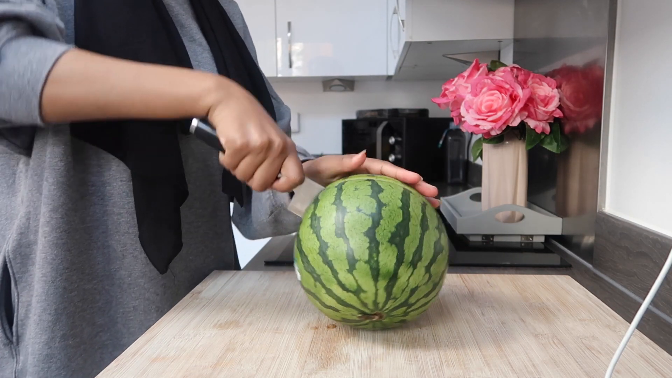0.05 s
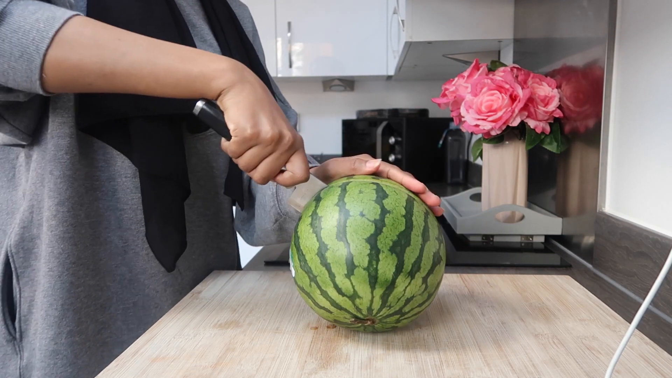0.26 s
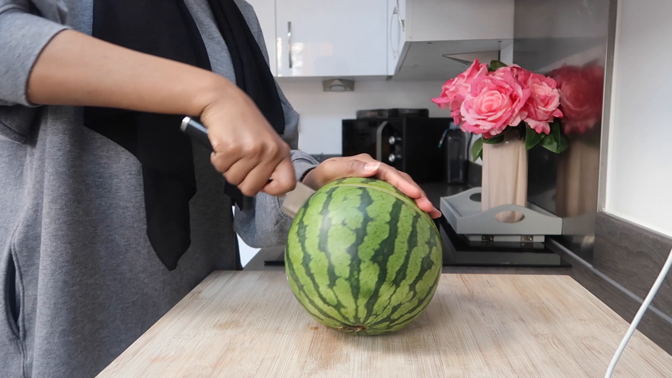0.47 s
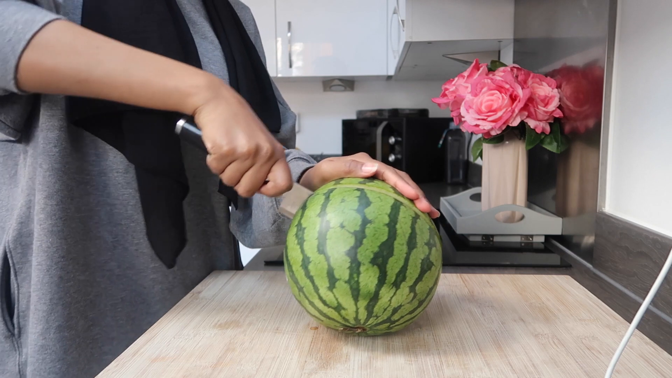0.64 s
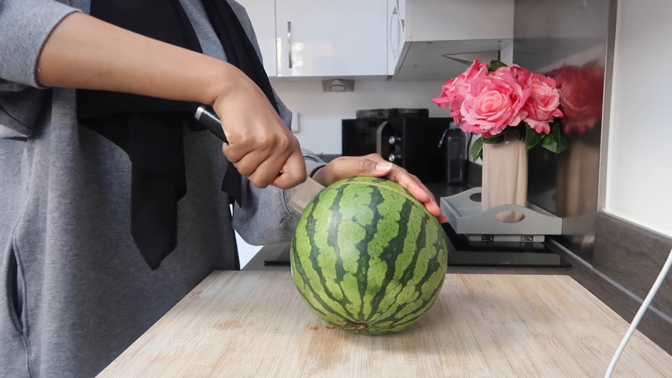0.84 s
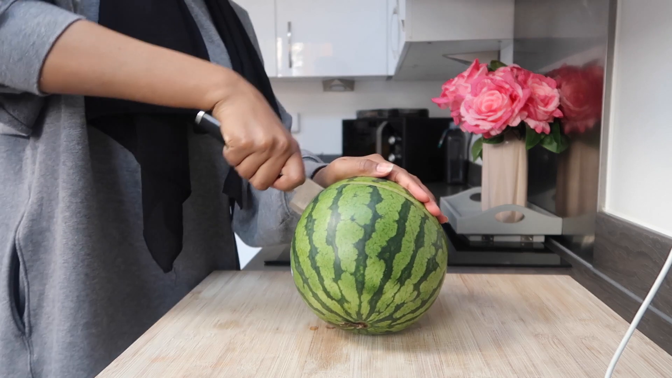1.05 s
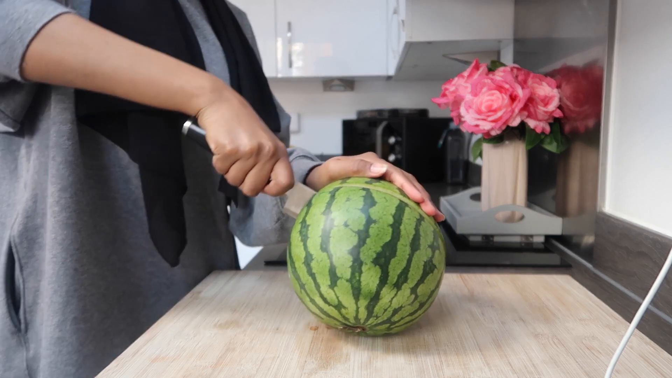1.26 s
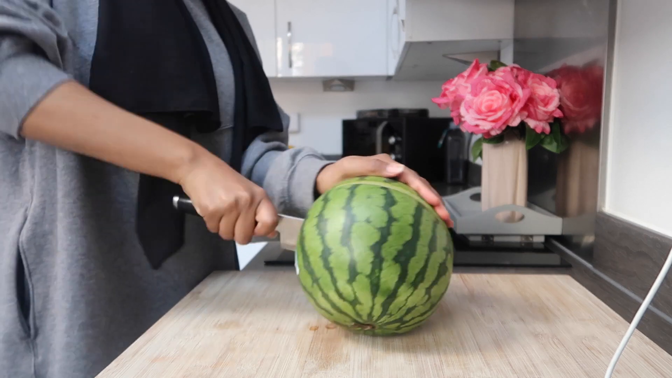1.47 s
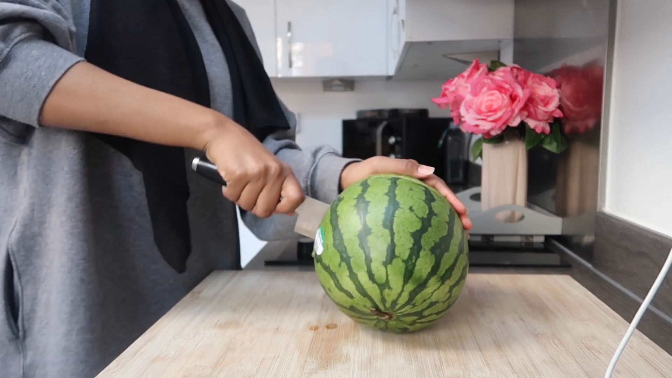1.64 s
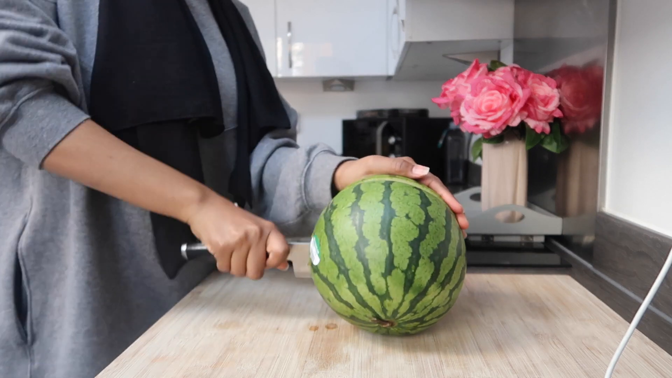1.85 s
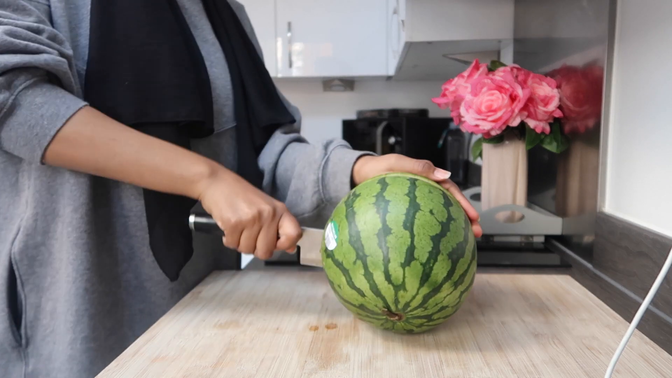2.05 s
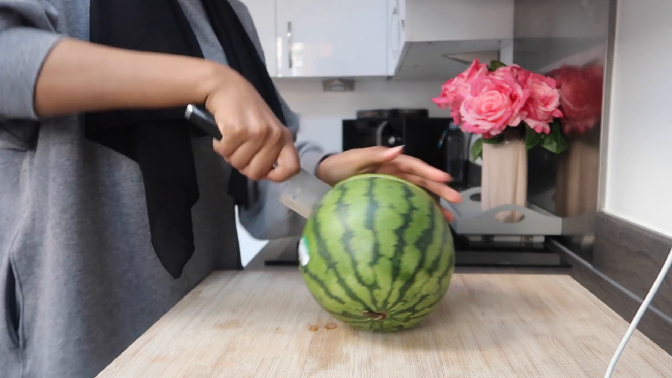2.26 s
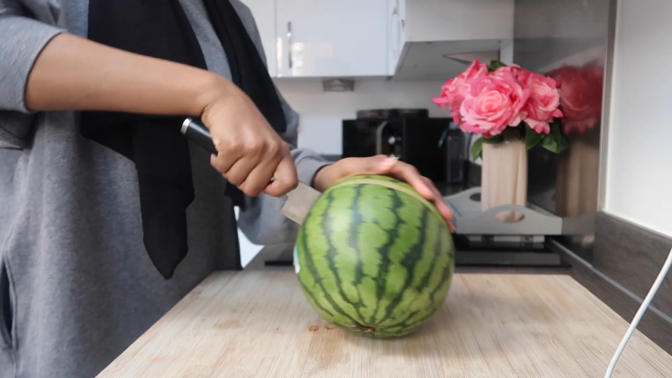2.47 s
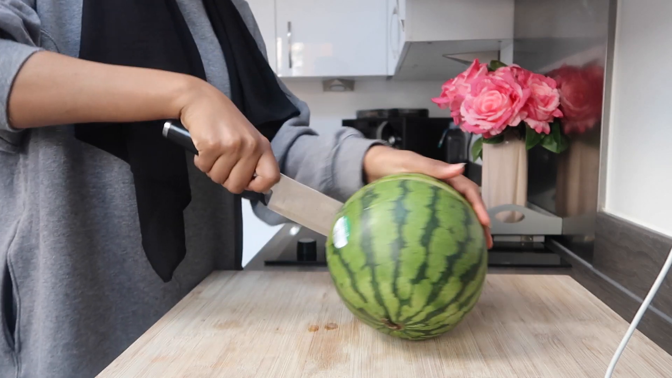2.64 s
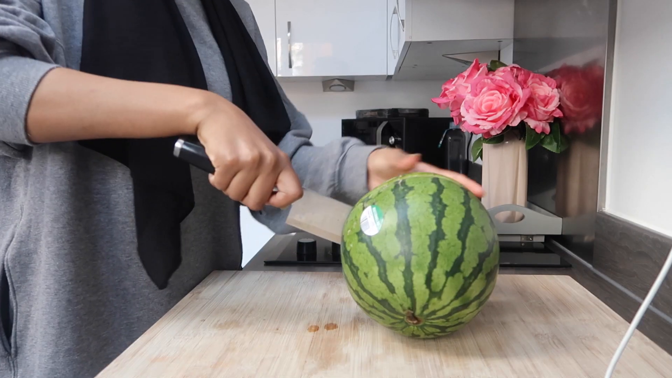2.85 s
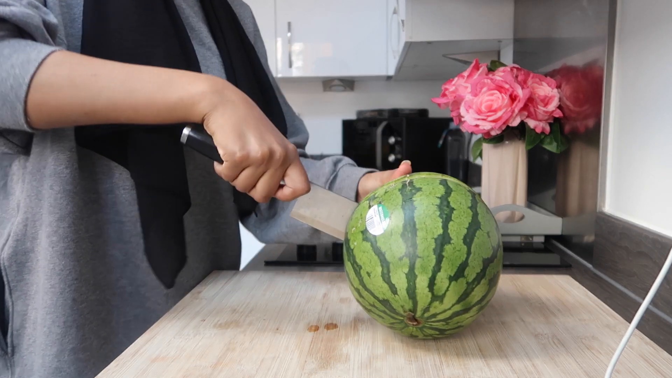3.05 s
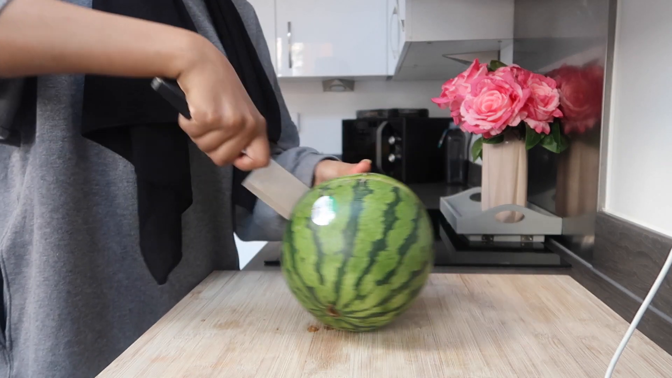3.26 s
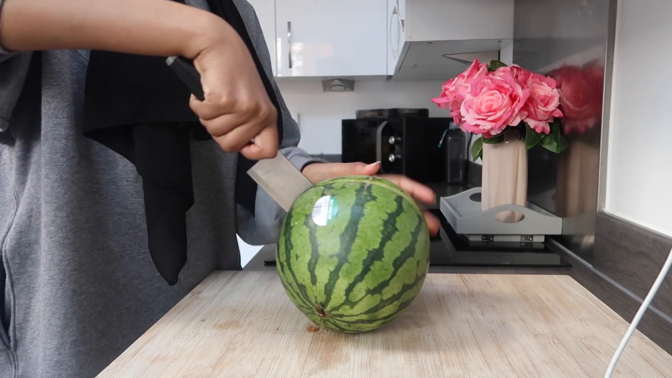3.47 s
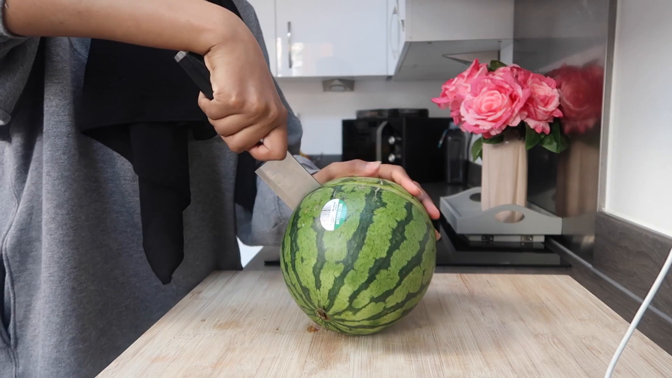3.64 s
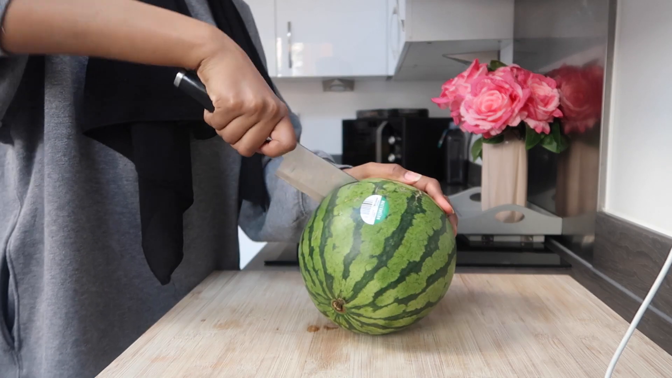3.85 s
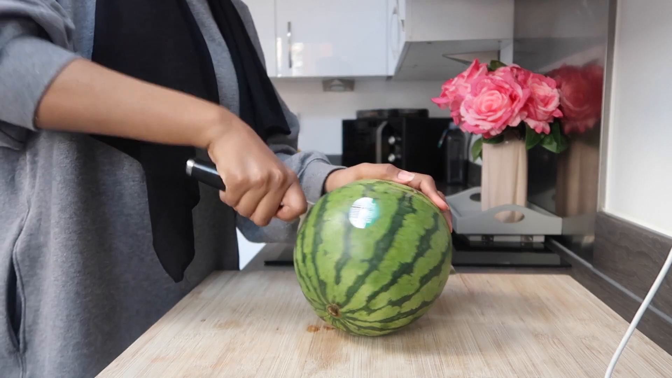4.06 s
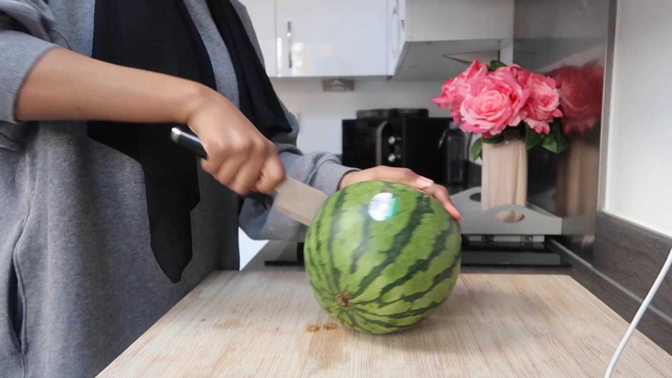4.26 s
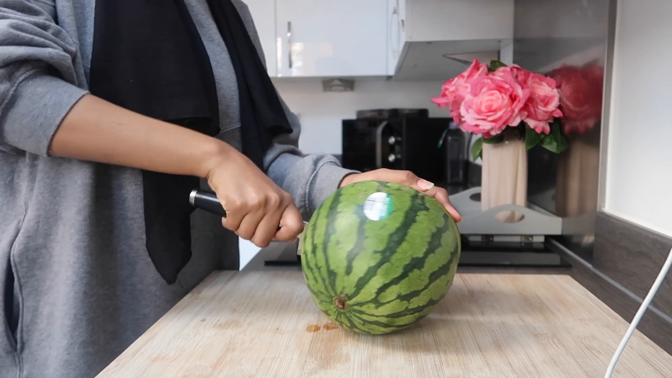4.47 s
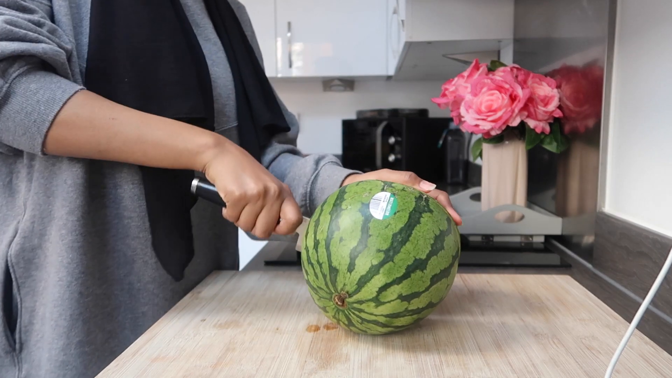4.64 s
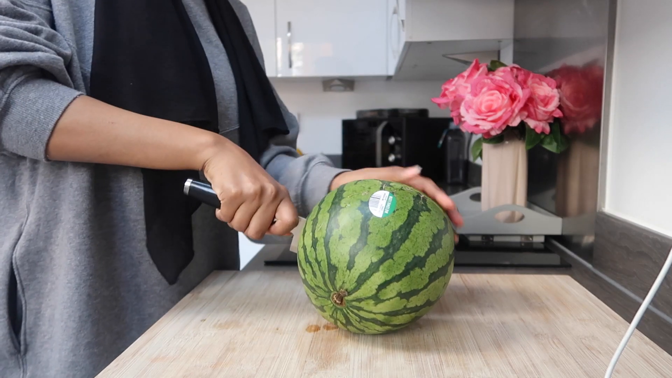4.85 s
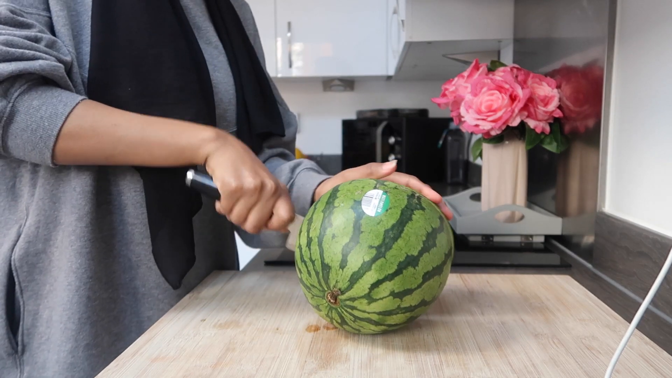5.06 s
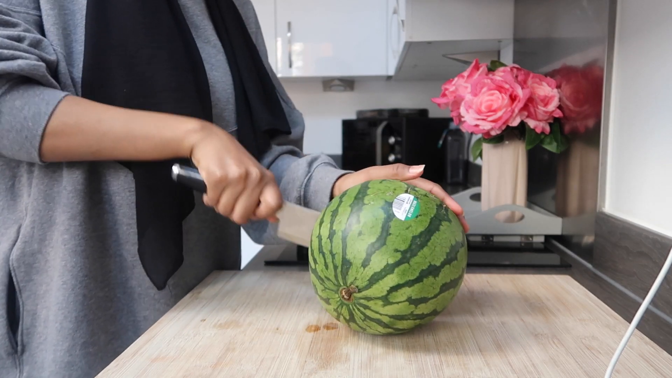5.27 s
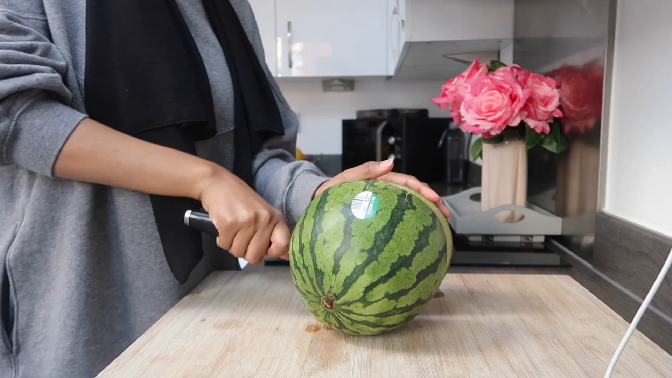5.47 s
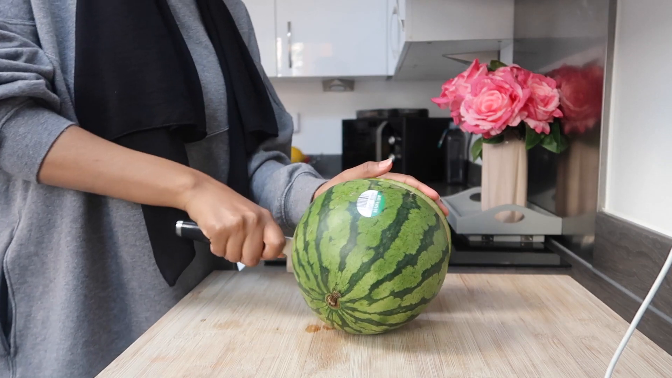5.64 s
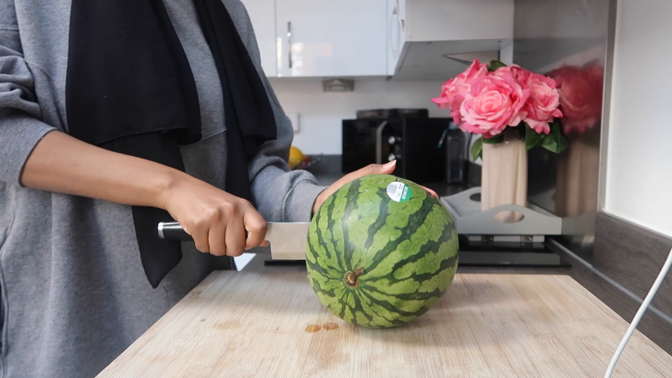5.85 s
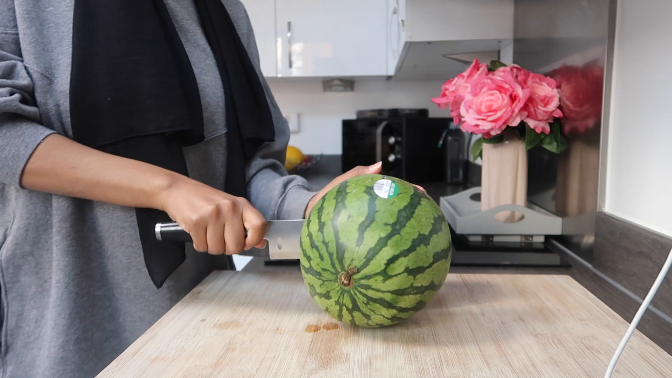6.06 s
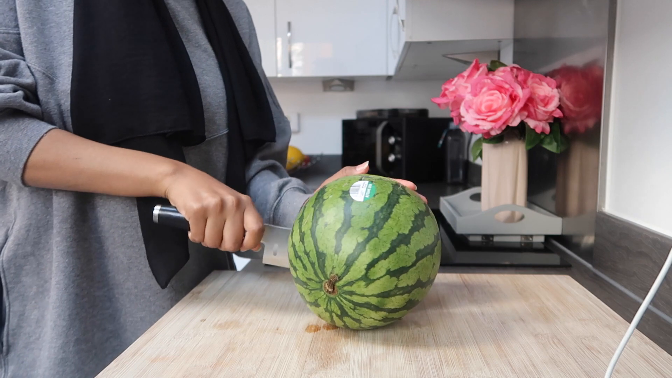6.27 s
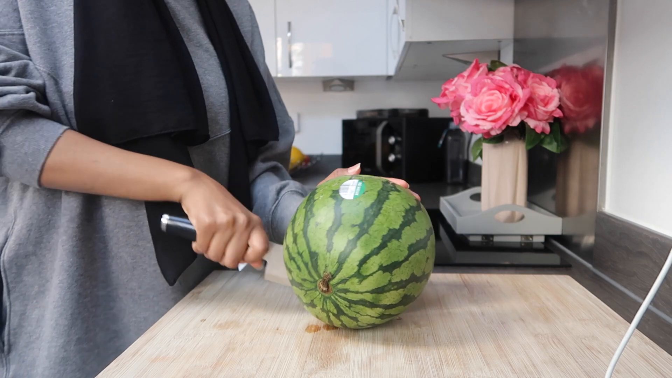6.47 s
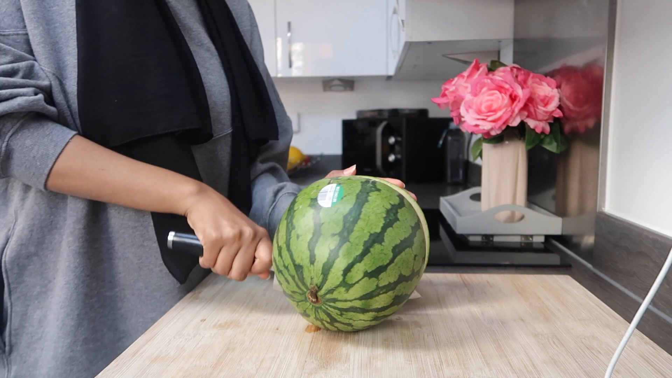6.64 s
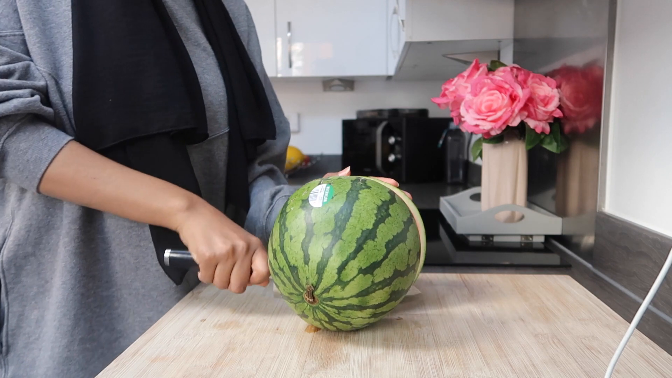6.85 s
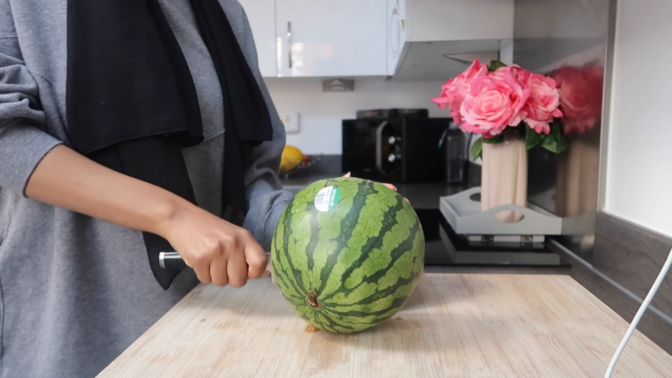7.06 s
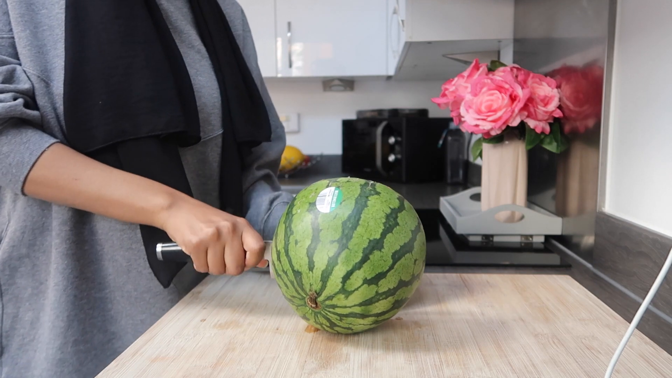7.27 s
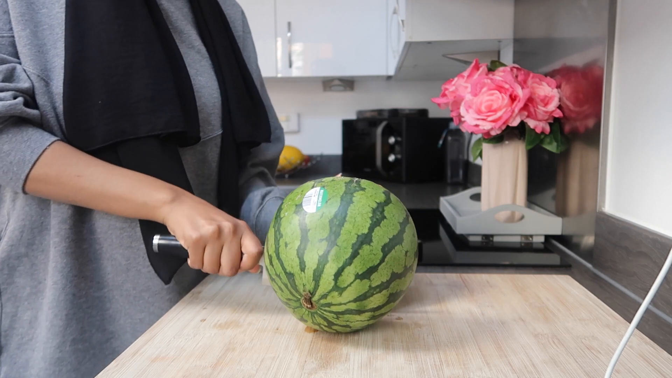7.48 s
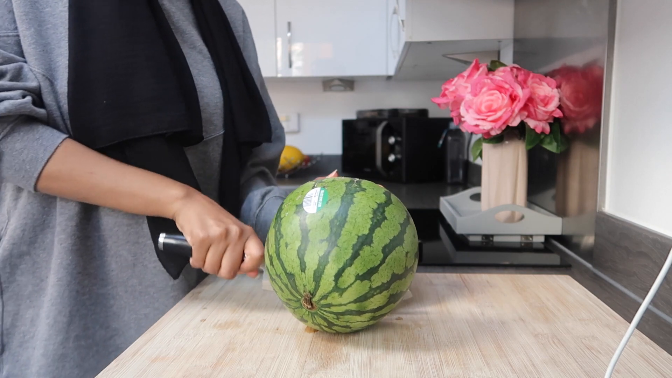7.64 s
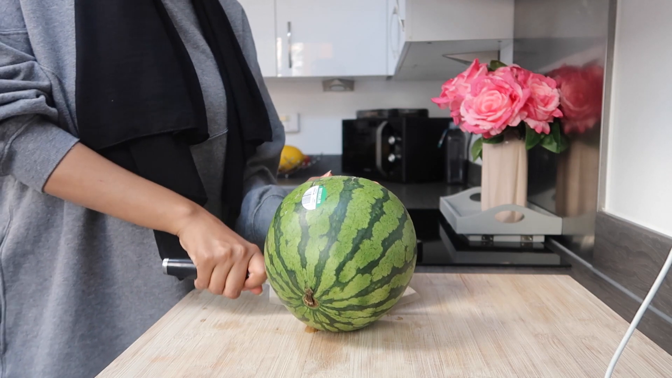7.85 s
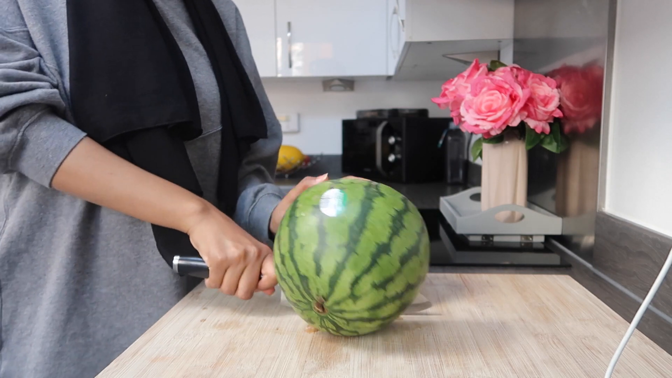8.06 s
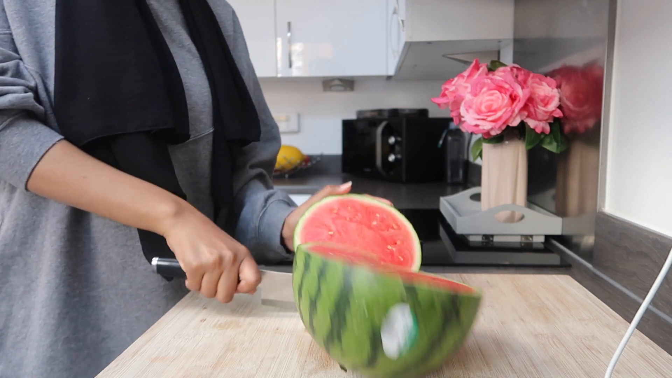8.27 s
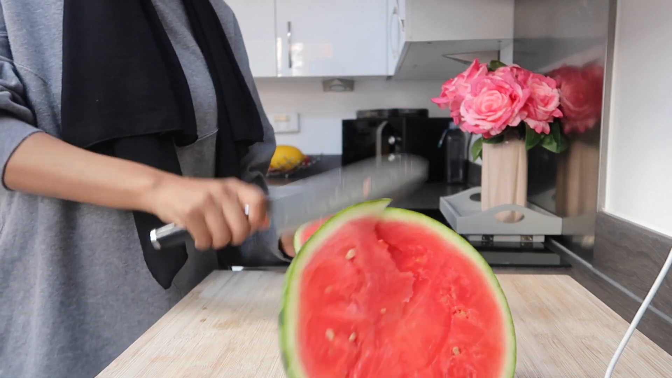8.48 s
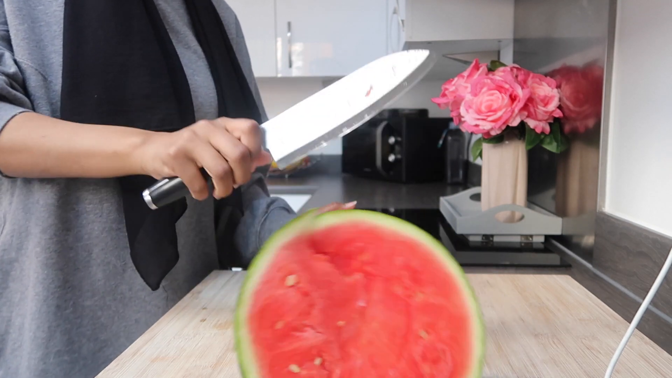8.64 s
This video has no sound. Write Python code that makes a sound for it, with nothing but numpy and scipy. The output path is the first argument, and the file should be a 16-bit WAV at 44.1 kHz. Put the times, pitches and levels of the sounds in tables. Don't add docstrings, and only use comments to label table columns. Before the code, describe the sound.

A quiet small kitchen, heard close in stereo, with soft air hiss and faint fridge hum. For the first second the blade barely rasps; a low counter shake and light rub come at about 1.1 s. At 1.5 s a hard push breaks the rind in a fast run of sharp, ringing cracks over wet crunch and hollow boom, with a second, shorter run at 1.9. From 2.2 to 3.9 only faint slides and small ticks. Strong, brighter cracking bursts return at 4.1, 4.5 and 5.4 s, each shaking the counter with a low thud. Weaker, softer crackles follow around 6.6 and 6.8, then small taps and a longer wet rub near 7.8. At 8.1 s a last crunch leads into a loud woody knock on the board, steely clicks and two deep thumps as the halves drop. A brief room tail fades to a quieter hush.

```python
import sys
import numpy as np
from scipy import signal
from scipy.fft import rfft, irfft, next_fast_len
from scipy.io import wavfile
from scipy.ndimage import uniform_filter1d

SR = 44100
rng = np.random.default_rng(int(sys.argv[2]) if len(sys.argv) > 2 else 0)


def persist_wave(psi):
    counts = np.round(np.clip(psi, -1, 1) * 32767).astype(np.int16)
    wavfile.write(sys.argv[1], SR, np.atleast_2d(counts).T)


def rack_gain(trim_db):
    fader = np.asarray(trim_db, float)
    return 10 ** (fader / 20)


N = 384111

# pitch_hz, width_hz, level_db
RIND_MODES = [(1370, 360, -7), (2154, 231, 2.5), (2487, 444, -5.5), (3503, 324, 0), (3810, 690, -8.5),
              (5480, 1400, -21)]
# pitch_hz, width_hz, level_db
HOLLOW_MODES = [(421, 47, -5.5), (652, 63, -2), (806, 67, -4)]


def rms_one(x):
    return x / np.sqrt(np.mean(x ** 2) + 1e-20)


def at_hz(points, hz):
    point_hz, value = np.array(points).T
    return np.interp(np.log(hz + 1), np.log(point_hz), value)


def band(x, low_hz, high_hz, order=2):
    return signal.sosfilt(signal.butter(order, [low_hz, high_hz], "band", fs=SR, output="sos"), x)


def resonate(x, hz, width_hz):
    r = np.exp(-np.pi * width_hz / SR)
    zeros = np.array([1, 0, -1]) * (1 - r * r) / 2
    poles = [1, -2 * r * np.cos(2 * np.pi * hz / SR), r * r]
    return signal.lfilter(zeros, poles, x)


def body(x, modes):
    return sum((-1) ** k * rack_gain(db) * resonate(x, hz, width) for k, (hz, width, db) in enumerate(modes))


def drift(rate_hz):
    knots = rng.standard_normal(N // 200 + 2)
    return np.interp(np.arange(N) * rate_hz / SR, np.arange(len(knots)), knots)


def steady(x, over_s):
    return x / np.sqrt(uniform_filter1d(x ** 2, int(over_s * SR)) + 1e-20)


def swell(start_s, hold_s, top_db, rise_db_per_s, fall_db_per_s):
    t = np.arange(0, N + 32, 32)[:, None] / SR
    rise_db = rise_db_per_s * np.maximum(start_s - t, 0)
    fall_db = fall_db_per_s * np.maximum(t - start_s - np.abs(hold_s), 0)
    power = rack_gain(2 * np.maximum(top_db - rise_db - fall_db, -150))
    return np.interp(np.arange(N) / SR, t[:, 0], np.sqrt(np.sum(power, axis=1)))


def add(out, start_s, sound):
    i = round(start_s * SR)
    out[i:i + len(sound)] += sound[:N - i]


def level_control_db():
    # time_s, gain_db
    back_off = [(8.14, -2.5), (8.3, -9), (8.55, -10), (8.7, -7.5)]
    time_s, gain_db = np.transpose(back_off)
    return np.interp(np.arange(N) / SR, time_s, gain_db)


def blade():
    # start_s, hold_s, crunch_db, hollow body rel_db, wet hiss rel_db
    pushes = [(1.524, 0.032, -21.5, -2, -12.5), (1.876, 0.046, -26.5, 0.5, -8),
              (4.09, 0.08, -24.5, -7.5, -9.5), (4.484, 0.071, -23.5, -7.5, -15),
              (5.399, 0.07, -26, -16, -17), (5.541, 0.0038, -32.5, -10.5, -4), (6.55, 0.093, -33.5, -9, -9),
              (6.753, 0.057, -37, -6, -3), (8.053, .05, -32, -7.5, -6), (8.112, .015, -27, -4.5, -3),
              (1.488, .02, -39, -10, -16), (1.855, .03, -43, -6, -14), (4.065, .02, -35.5, -8, -16)]
    # start_s, hold_s, rasp_db, wet hiss rel_db
    slides = [(0.0, 0.18, -55, -3.5), (0.563, 0.038, -50, -8.5), (1.16, .08, -41, -12),
              (2.24, 0.065, -52.5, -8), (2.426, .03, -52, -3), (2.663, 0.0092, -52.5, -11.5),
              (2.857, 0.044, -53.5, -3.5), (3.08, .01, -63.5, 5), (3.304, 0.096, -52, -4),
              (3.562, 0.087, -54.5, -5.5), (3.828, 0.054, -45.5, -8), (4.34, 0.078, -47, -13),
              (5.057, 0.036, -47, -12), (5.244, 0.048, -50.5, -24), (5.75, 0.036, -49.5, -17),
              (6.447, .01, -47.5, -5.5), (7.144, .02, -51.5, -4.5), (7.618, 0.042, -49, -3.5),
              (7.77, .15, -36, -7), (6.53, 0.022, -46, -8.5), (5.198, .01, -54, -16),
              (2.78, .03, -54.5, -11)]
    # crunch_db, hollow_db, hiss_db
    resting = (-59, -62, -70.5)
    start_s, hold_s, db, hollow_db, wet_db = np.transpose(pushes)
    push_rise = 1298.5
    rind = swell(start_s, hold_s, db, push_rise, 195)
    hollow = swell(start_s, hold_s, db + hollow_db, push_rise, 149.5)
    hiss = swell(start_s, hold_s, db + wet_db, push_rise, 242.5)
    start_s, hold_s, db, wet_db = np.transpose(slides)
    rasp = swell(start_s, hold_s, db, 300, 240)
    slide_hiss = swell(start_s, hold_s, db + wet_db, 300, 240)
    rest = rack_gain(np.array(resting)[:, None] + level_control_db())
    hollow = np.hypot(hollow, rack_gain(-8) * rasp)
    hiss = np.hypot(hiss, slide_hiss)
    return np.hypot(rind, rest[0]), rasp, np.hypot(hollow, rest[1]), np.hypot(hiss, rest[2])


def crunch():
    # pitch_hz, width_hz, level_db
    rasp_modes = [(2200, 400, 0), (5600, 1500, -16), (3400, 800, -9)]
    rind_gain, rasp_gain, hollow_gain, hiss_gain = blade()
    bursts_per_s = 9000
    sizes = rack_gain(3.86 * np.minimum(rng.exponential(1, N), 4)) * rng.choice([-1, 1], N)
    cells = sizes * (rng.random(N) < bursts_per_s / SR) * rack_gain(3.2 * drift(120)) + 1e-18
    rind = rms_one(body(cells, RIND_MODES) + 0.26 * band(cells, 810, 7100))
    hollow = rms_one(body(cells, HOLLOW_MODES) + 0.54 * band(cells, 316, 1213))
    other_cells = cells[::-1]
    hiss = rms_one(band(other_cells, 4800, 13000) + 0.5 * resonate(other_cells, 7900, 2500))
    rub = rng.standard_normal(N) * rack_gain(1.5 * drift(60)) + 0.4 * cells
    rasp = rms_one(body(rub, rasp_modes) + 0.45 * band(rub, 1100, 7000))
    solid = rind_gain * rind + rasp_gain * rasp + hollow_gain * hollow
    return rack_gain(-3.5) * solid + rack_gain(-1.0) * hiss_gain * hiss


def cracks():
    # start_s, peak_db, ring_hz, hollow body rel_db
    first_cracks = [(1.1767, -37, 2170, -19), (1.2016, -28, 2180, -25), (1.493, -28, 3160, -21),
                    (1.505, -19, 3150, -17), (1.5149, -9, 3160, -7), (1.5243, -7, 3030, -5),
                    (1.5314, -7.5, 3150, -5), (1.5424, -3.5, 2090, -9), (1.5524, -7.5, 2080, 3.5),
                    (1.5751, -10.5, 3270, -20), (1.5867, -17, 2200, -8), (1.848, -37, 2790, -17),
                    (1.8696, -21, 3420, -20), (1.8835, -11, 3250, -22), (1.894, -10.5, 3360, -13),
                    (1.9046, -8.5, 1370, 0), (1.9135, -9.5, 2490, 0.5), (1.9224, -14, 1430, 4.5),
                    (1.9334, -12, 1360, 2.5)]
    # start_s, peak_db, ring_hz
    deep_cracks = [(4.067, -30, 2280), (4.082, -10, 2340), (4.091, -18, 2280), (4.1125, -9.5, 2500),
                   (4.1171, -6, 2370), (4.134, -9.5, 2230), (4.1412, -9, 2500), (4.16, -3.5, 2350),
                   (4.1859, -14.5, 1290), (4.4739, -4.5, 1370), (4.4864, -13, 1370), (4.5049, -4.5, 2330),
                   (4.5179, -8, 3300), (4.5287, -14.5, 3200), (4.5381, -9.5, 1320), (4.5477, -8.5, 1320),
                   (4.5743, -15, 1370), (4.5874, -17.5, 1360), (5.3911, -8.5, 2140), (5.406, -15, 2290),
                   (5.4306, -5.5, 2240), (5.4374, -17.5, 2440), (5.4475, -9.5, 1350), (5.468, -9, 1370),
                   (5.536, -27, 2070), (5.5542, -12.5, 2140)]
    # start_s, peak_db, ring_hz, hollow body rel_db
    small_cracks = [(2.8065, -38, 2150, -16), (3.3187, -24.5, 2400, -9), (4.3197, -33, 1380, -27),
                    (5.2612, -37.5, 1770, -16), (5.69, -39.5, 1280, -17), (5.771, -36, 1340, -19),
                    (6.2387, -39, 1760, -21), (6.5566, -26, 2000, -20), (6.576, -24, 1740, -21),
                    (6.643, -25, 2200, -18), (6.5893, -25, 1770, -19), (6.656, -25, 1330, -20),
                    (6.746, -22.5, 3050, -15), (6.795, -19, 2680, -16), (6.81, -25, 3000, -21),
                    (6.824, -25, 1780, -18), (7.0428, -39, 1200, 8), (7.1619, -36, 1880, -15),
                    (8.049, -32, 2860, -9), (8.108, -14, 2500, -13), (8.1333, -8, 2200, -22)]
    deep_hollow_db = -18.5
    rows = [*first_cracks, *[(*crack, deep_hollow_db) for crack in deep_cracks], *small_cracks]
    out, t = np.zeros(N), np.arange(1600) / SR
    snap_click = 3.0 * (np.arange(1600) == 12)
    tears = rng.standard_normal((len(rows), 1600)) + snap_click
    envelope = rack_gain(-60 * np.maximum(t - 0.002, 0) / 0.016) * np.minimum(t / 0.00029, 1)
    for (start_s, peak_db, hz, hollow_db), tear in zip(rows, tears):
        burst = tear * envelope
        ringing = 1.5 * resonate(burst, hz, 800) + 0.53 * body(burst, RIND_MODES)
        snap = band(ringing + 0.35 * burst, 953, 6940, order=3)
        cavity = body(burst * rack_gain(-60 * t / 0.006), HOLLOW_MODES)
        spit = band(burst, 3900, 17000)
        spit_db = -13 - 0.08 * peak_db + 5 * np.log2(hz / 2200)
        layers = snap / abs(snap).max()
        layers += rack_gain(hollow_db - 2.5) * cavity / abs(cavity).max()
        layers += rack_gain(spit_db) * spit / abs(spit).max()
        add(out, start_s, rack_gain(peak_db - 1.0) * layers)
    return out


def knock():
    # pitch_hz, level_db, t60_s
    board_modes = [(683, 2, 0.053), (778, -0.5, 0.034), (1080, 6.5, 0.013), (1300, 9, 0.025),
                   (1490, 4.5, 0.013), (1780, 0.5, 0.016), (2140, -12, 0.011)]
    # start_s, level_db, pitch_hz, t60_s
    thumps = [
        (8.113, -9, 110, 0.052),
        (8.132, -5.5, 189, 0.042),
    ]
    knock_s, knock_db = 8.1333, -10.5
    out, t = np.zeros(N), np.arange(9000) / SR
    ring = sum(rack_gain(knock_db + db - 60 * t / t60) * np.sin(2 * np.pi * hz * t) for hz, db, t60 in board_modes)
    for lag_s, db in [(0, -1.5), (0.0012, -1), (0.0081, -11.5)]:
        add(out, knock_s + lag_s, rack_gain(db) * ring)
    tail_t = np.arange(SR // 2) / SR
    tail = rms_one(band(rng.standard_normal(SR // 2), 550, 1400, order=3))
    add(out, knock_s + 0.004, tail * rack_gain(-25 - 60 * tail_t / 0.56))
    for start_s, db, hz, t60 in thumps:
        thump = np.sin(2 * np.pi * hz * t) * np.minimum(t / 0.0035, 1)
        add(out, start_s, -rack_gain(db - 60 * t / t60) * thump)
    return out


def ticks():
    # start_s, peak_db, pitch_hz, t60_s
    steel_ticks = [
        (8.1105, -4, 6800, 0.018),
        (8.1297, -6.5, 5000, 0.012),
        (5.3, -43.5, 8600, .006),
        (8.62, -51, 5000, .03),
        (2.664, -43, 1350, .06),
        (4.839, -42, 1400, .04),
        (4.839, -45, 2200, .03),
        (7.041, -38, 2200, .02),
    ]
    out, t = np.zeros(N), np.arange(1000) / SR
    for start_s, peak_db, hz, t60 in steel_ticks:
        burst = rng.standard_normal(1000) * rack_gain(-60 * t / t60) * np.minimum(t / 0.0017, 1)
        tick = band(burst, hz / 1.4, hz * 1.17)
        add(out, start_s, rack_gain(peak_db) * tick / abs(tick).max())
    return out


def counter():
    # start_s, hold_s, sway_db, board_db
    jolts = [(0.134, .01, -43.5, -56), (0.327, .01, -47, -57), (0.504, .05, -44.5, -55),
             (1.041, 0.055, -33.5, -38.5), (1.545, 0.015, -31, -26.5), (1.917, .02, -36.5, -26.5),
             (2.376, 0.084, -45.5, -58), (3.342, 0.09, -59, -51.5), (3.8, 0.11, -49, -62),
             (4.142, 0.023, -28.5, -31), (4.504, 0.064, -32.5, -31), (5.068, .01, -38, -54),
             (5.412, .12, -39.5, -36.5), (6.579, 0.038, -31, -36.5), (6.792, 0.04, -42, -43),
             (7.807, 0.037, -39, -37.5), (8.11, 0.0088, -37, -28.5), (8.45, 0.067, -31, -49),
             (1.256, 0.027, -43.5, -45), (2.25, .03, -45.5, -51), (5.635, 0.017, -44, -57),
             (8.358, .03, -38, -49), (7.574, 0.054, -54, -51)]
    start_s, hold_s, sway_db, board_db = np.transpose(jolts)
    a, b = rng.standard_normal((2, N))
    sway = steady(resonate(resonate(a, 34.5, 11.8), 33, 22) + 0.3 * resonate(a, 49, 5.9), 0.05)
    flex = steady(band(resonate(b, 100.7, 32) - 0.3 * resonate(b, 197.6, 67), 65, 250), 0.05)
    sway_lag_s = 0.015
    sway_gain = swell(start_s + sway_lag_s, hold_s, sway_db, 300, 168)
    sway_gain = np.hypot(sway_gain, rack_gain(-52.5 + 3.8 * drift(9)))
    board_gain = np.hypot(swell(start_s, hold_s, board_db, 350, 181.5), rack_gain(-57.5))
    return sway_gain * sway + rack_gain(-3.0) * board_gain * flex


def room_tone():
    # pitch_hz, level_db (per Hz)
    air = [(71, -33.5), (120, -1.5), (160, -25.5), (185, -5), (567, -9), (680, -9.5), (924, -12.5),
           (1230, -11.5), (1430, -15.5), (2320, -18), (9000, -30.5), (11700, -41), (19800, -120)]
    # pitch_hz, correlation (-1 to 1)
    likeness = [(100, 0.73), (290, -0.16), (640, 0.34), (3100, -0.1), (7000, 0.19), (10000, -0.074),
                (13000, -1.2)]
    # pitch_hz, width_hz, level_db
    hum = [(101.2, 4.4, -53.5), (693, 1.5, -61.5), (800, 4.6, -70)]
    hz = np.fft.rfftfreq(N, 1 / SR)
    mid, side = rfft(rng.standard_normal((2, N))) * rack_gain(at_hz(air, hz))
    alike = np.clip(at_hz(likeness, hz), -0.99, 0.99)
    spread = np.sqrt((1 - alike) / (1 + alike)) * side
    hiss = irfft(mid + spread * [[1], [-1]], N) / np.std(irfft(mid, N))
    lines = sum(rack_gain(db) * steady(resonate(rng.standard_normal(N), f, width), 0.76) for f, width, db in hum)
    return rack_gain(-53.8) * hiss + lines


def kitchen(x, wet_db=-13, alike=0.95):
    # pitch_hz, t60_s
    room_t60 = [(150, 0.42), (700, 0.43), (2500, 0.29), (6000, 0.21), (12000, 0.088)]
    t = np.arange(SR // 2) / SR
    shared, own = rng.standard_normal((2, 2, len(t)))
    noise = alike * shared[0] + np.sqrt(1 - alike ** 2) * band(own, 460, 21000)
    tail = 0
    for hz in 150 * 2.0 ** np.arange(7):
        octave = band(noise, hz / 2 ** 0.5, hz * 2 ** 0.5)
        tail = tail + octave * rack_gain(-60 * t / at_hz(room_t60, hz))
    tail = tail * np.minimum(t / 0.0012, 1)
    tail = tail / np.sqrt(np.sum(tail[0] ** 2))
    return x + rack_gain(wet_db) * signal.fftconvolve(x[None], tail, axes=1)[:, :N]


def ports(x, left_db=-1.1):
    # pitch_hz, phase_rad (left against right)
    port_phase = [(100, 0), (1500, -.2), (3000, -.4), (4900, -1.2), (6500, -1.95), (8300, -2.35),
                  (10000, -2.6), (13000, -2.75)]
    size = next_fast_len(N)
    hz = np.fft.rfftfreq(size, 1 / SR)
    half = np.exp(0.5j * at_hz(port_phase, hz)) * rack_gain(left_db / 2 * np.clip(hz / 500, 0, 1))
    return irfft(rfft(x, size) * np.array([half, 1 / half]), size)[:, :N]


def scene():
    fruit = kitchen(crunch() + cracks()) + kitchen(knock(), wet_db=-20) + ticks()
    return ports(fruit) + counter() + room_tone() * rack_gain(level_control_db())


def treble_dropout(mid, side):
    # low_hz, high_hz, threshold_db (shared against opposed)
    dropout_bands = [(8400, 9200, -16), (9200, 10000, -12), (10000, 11000, -9), (11000, 12200, -8),
                     (12200, 13500, -7), (13500, 20000, -6)]
    hz, spectra = np.fft.rfftfreq(N, 1 / SR), rfft([mid, side])
    bright = band(mid, 2000, 8000) ** 2 + 1e-12
    jump = uniform_filter1d(bright, size=256) / uniform_filter1d(bright, size=3000)
    sudden_db = uniform_filter1d(np.maximum(10 * np.log10(jump), 0), size=700)
    whim_db = 11 * drift(14)
    for low_hz, high_hz, drop_db in dropout_bands:
        shared, opposed = irfft(spectra * (hz >= low_hz) * (hz < high_hz), N)
        shared_power, opposed_power = uniform_filter1d([shared ** 2, opposed ** 2], size=1024)
        threshold_db = 2 * (drop_db - 2.5 * sudden_db) + whim_db + 4 * drift(30)
        muted = shared_power < opposed_power * rack_gain(threshold_db) + rack_gain(-2 * 95)
        mid = mid - shared * uniform_filter1d(1.0 * muted, size=512)
    return mid


def band_limit(x):
    return signal.sosfilt(signal.butter(12, 15690, fs=SR, output="sos"), x)


def record(dry):
    ceiling = 0.93
    limited = np.tanh(dry / ceiling) * ceiling
    left, right = signal.sosfilt(signal.cheby2(8, 40, 15900, fs=SR, output="sos"), limited)
    mid, side = (left + right) / 2, (left - right) / 2
    mid = treble_dropout(mid, side)
    return band_limit(np.array([mid + side, mid - side]))


dry = scene()
out = record(dry)
persist_wave(out)
```